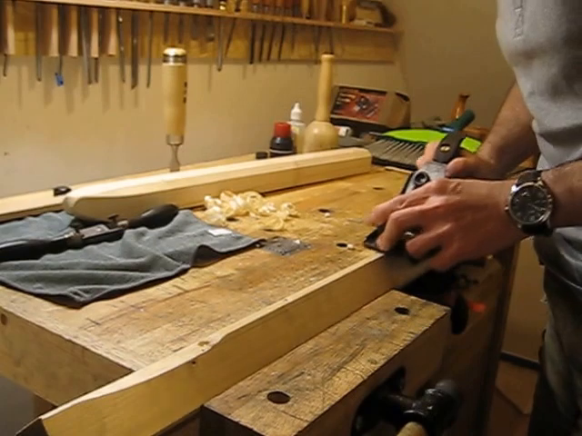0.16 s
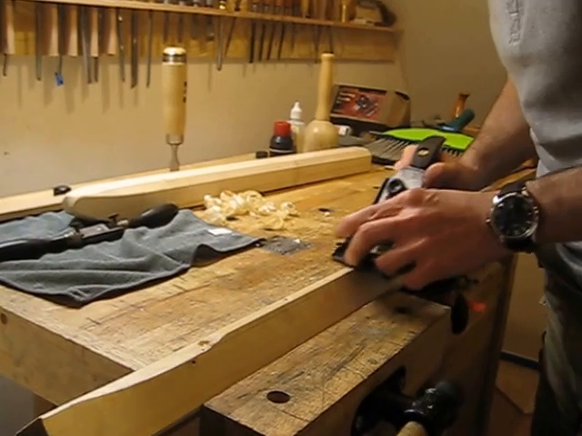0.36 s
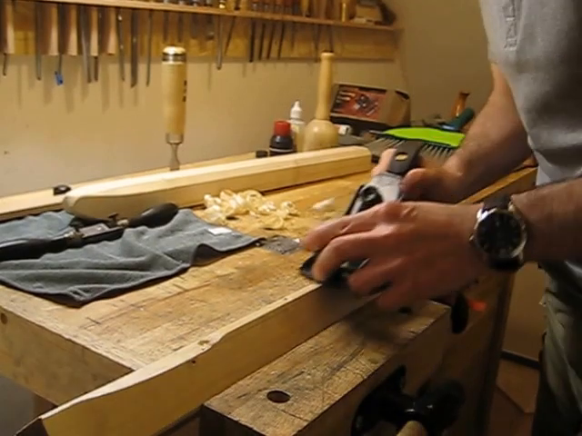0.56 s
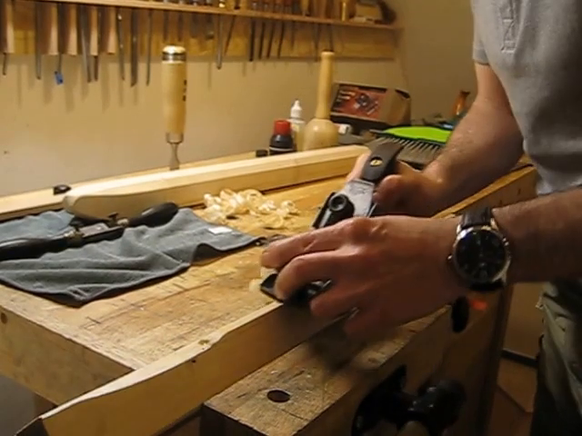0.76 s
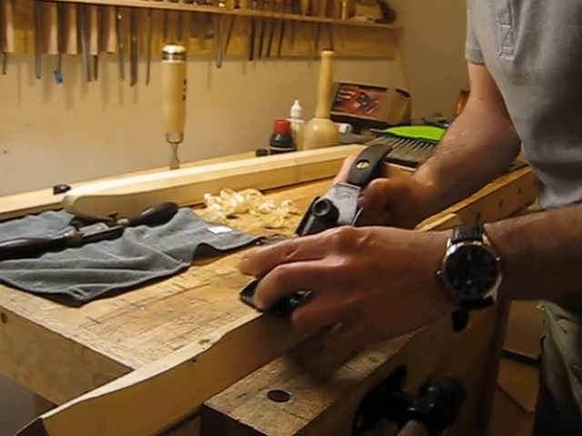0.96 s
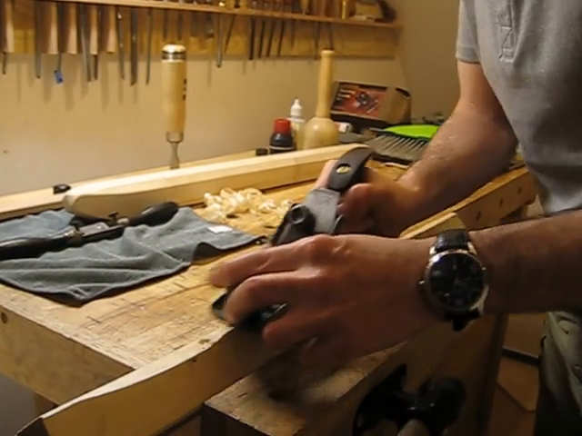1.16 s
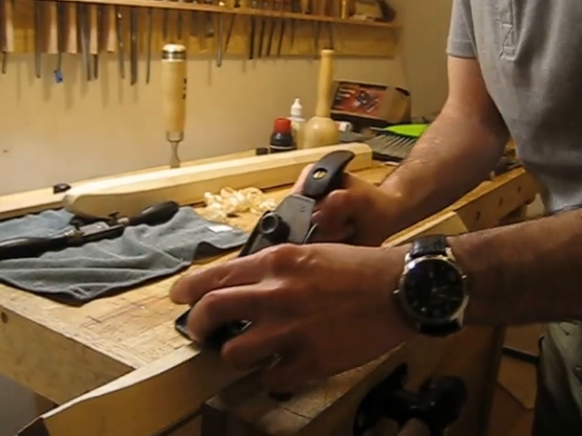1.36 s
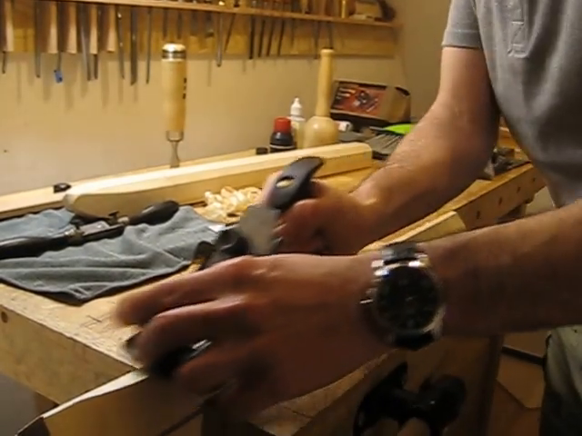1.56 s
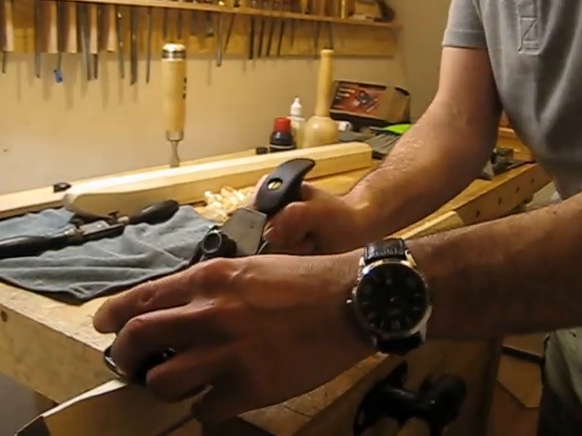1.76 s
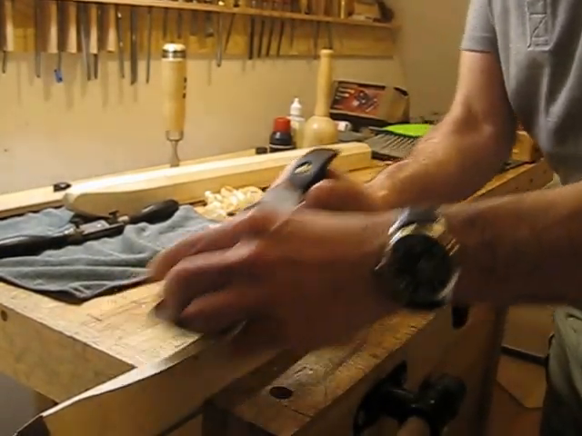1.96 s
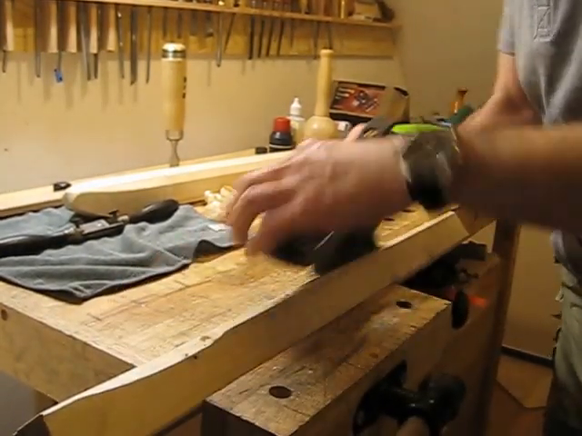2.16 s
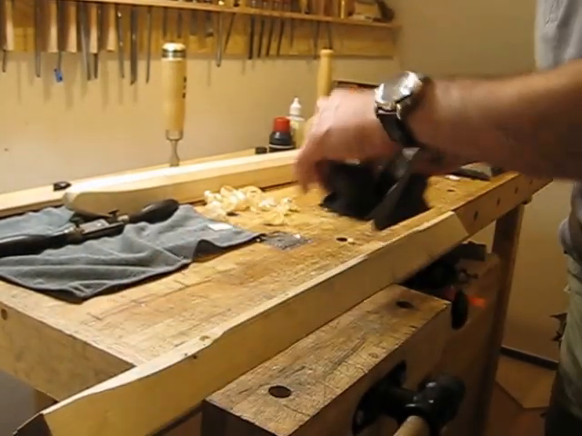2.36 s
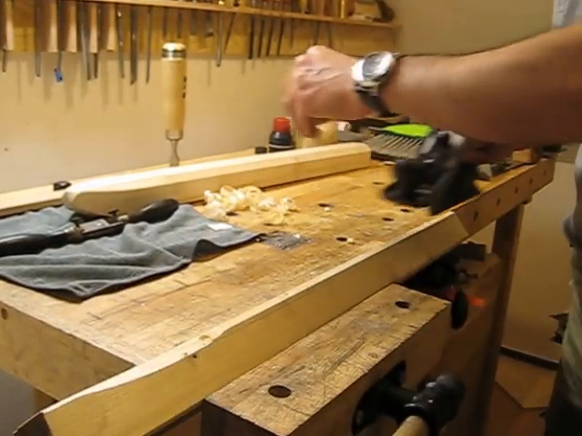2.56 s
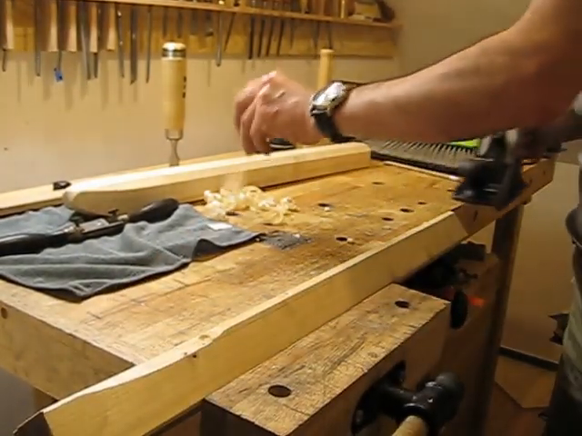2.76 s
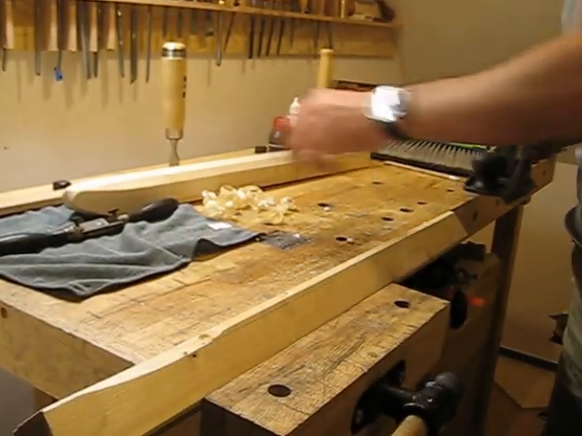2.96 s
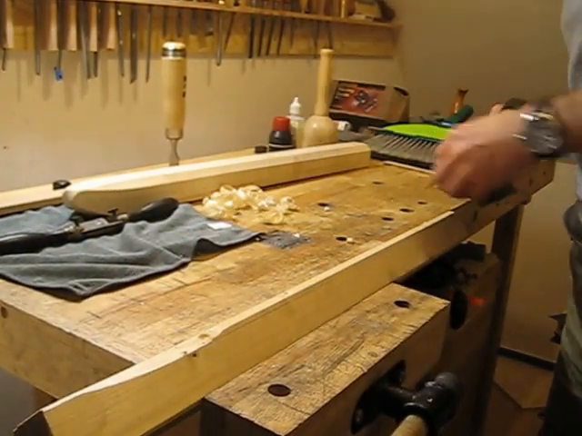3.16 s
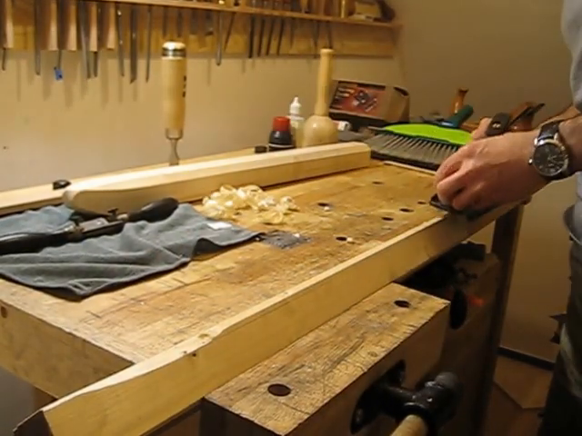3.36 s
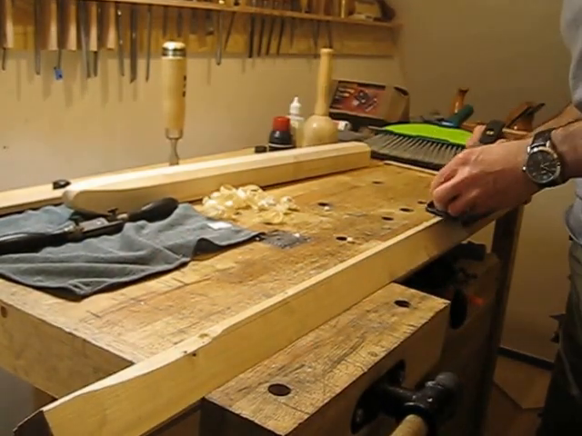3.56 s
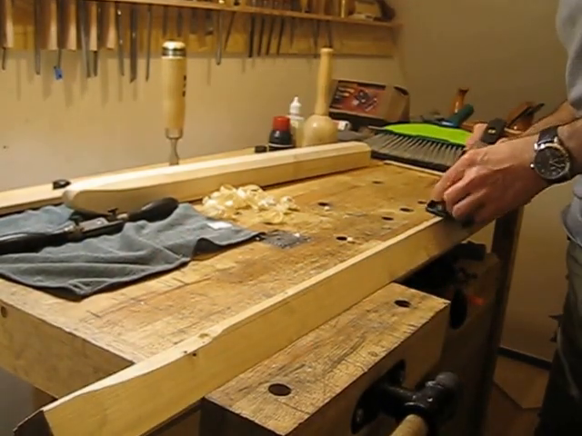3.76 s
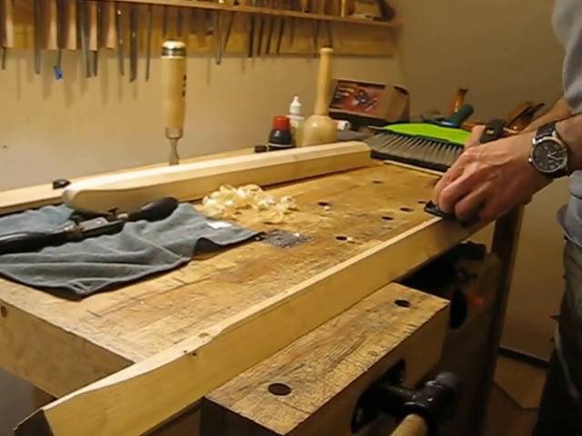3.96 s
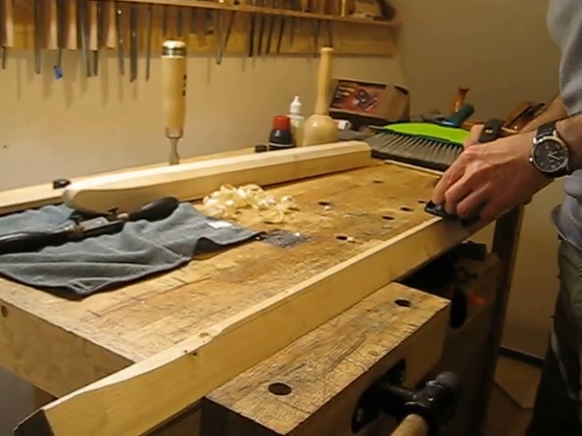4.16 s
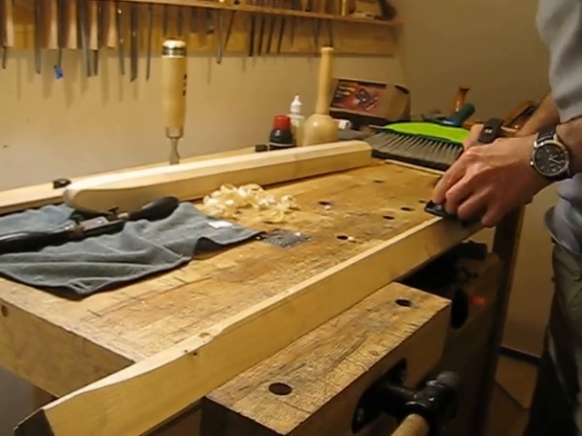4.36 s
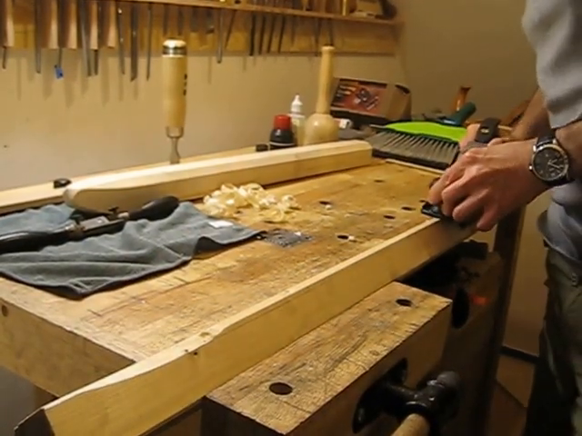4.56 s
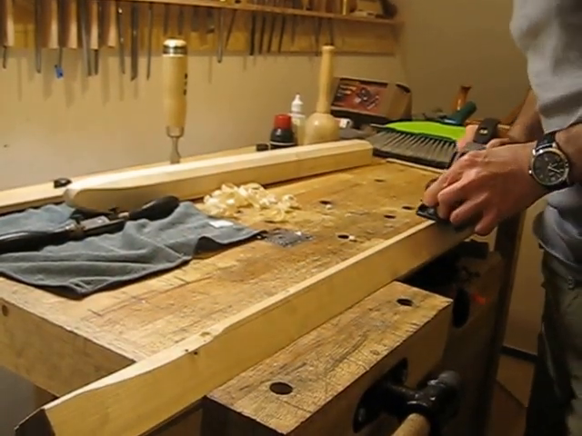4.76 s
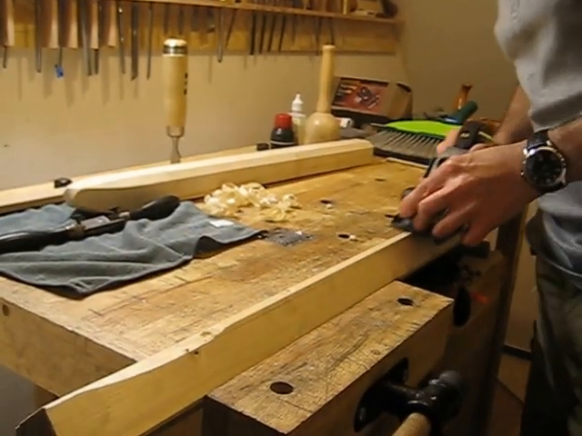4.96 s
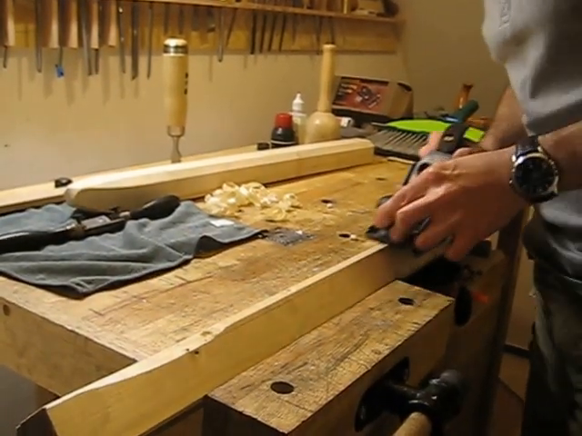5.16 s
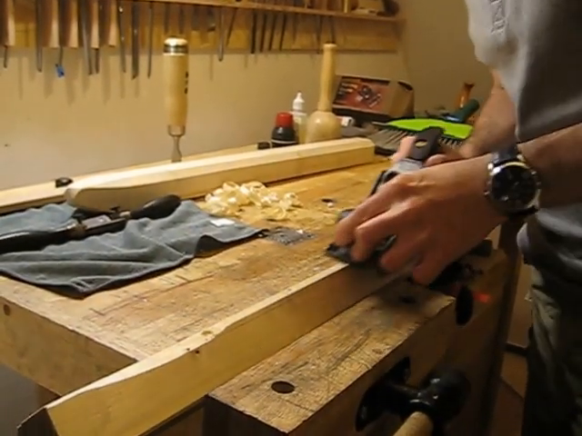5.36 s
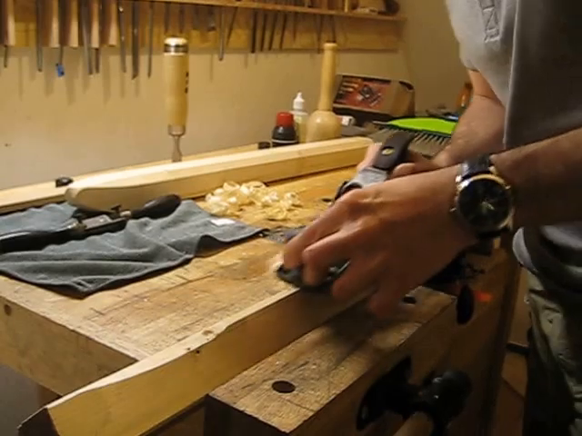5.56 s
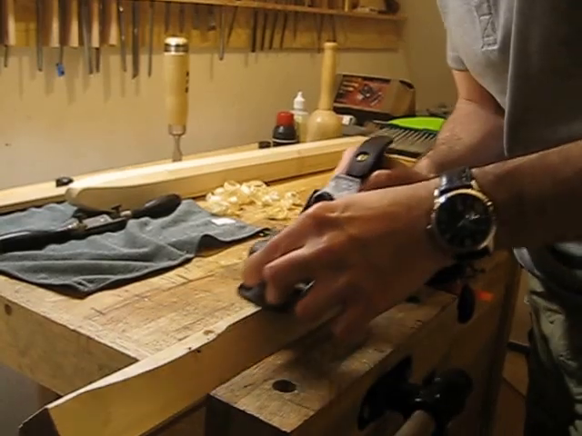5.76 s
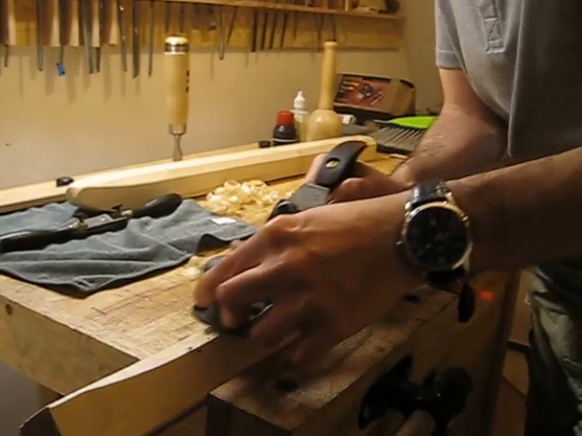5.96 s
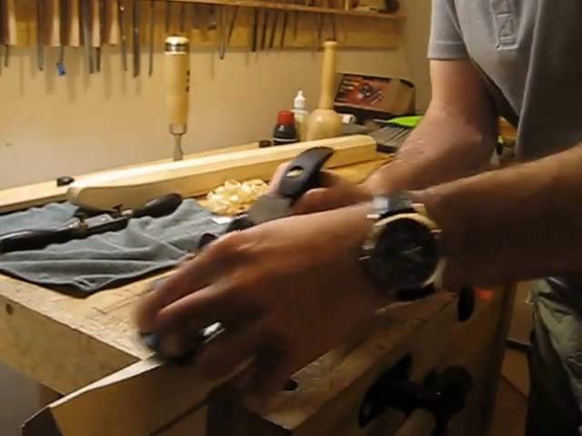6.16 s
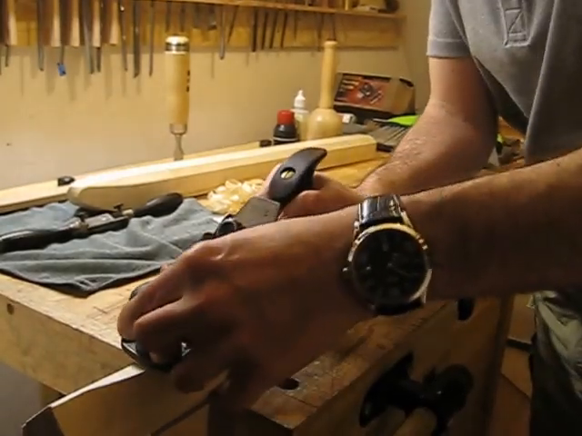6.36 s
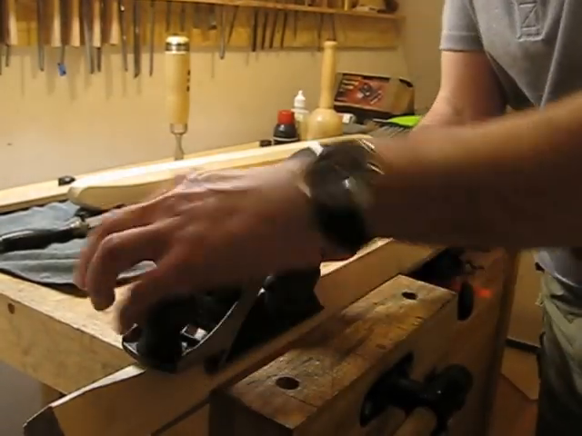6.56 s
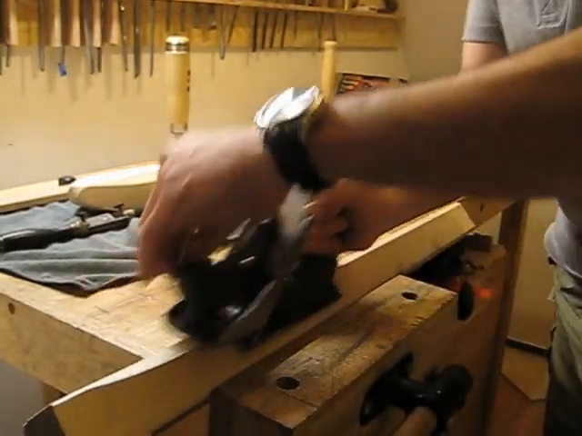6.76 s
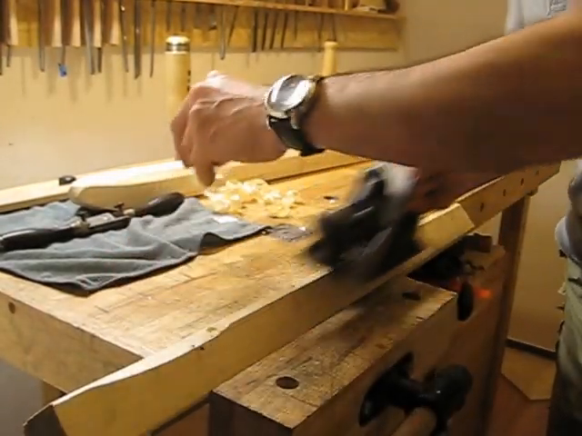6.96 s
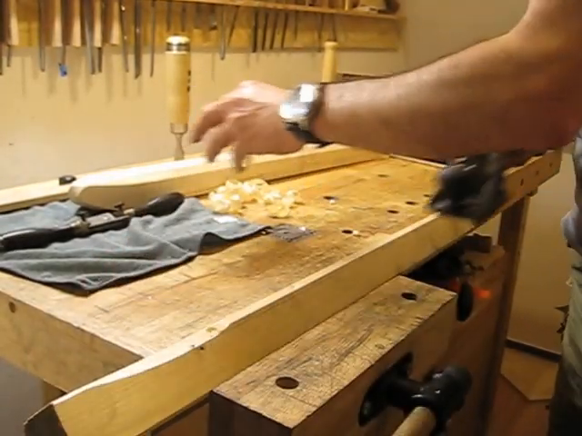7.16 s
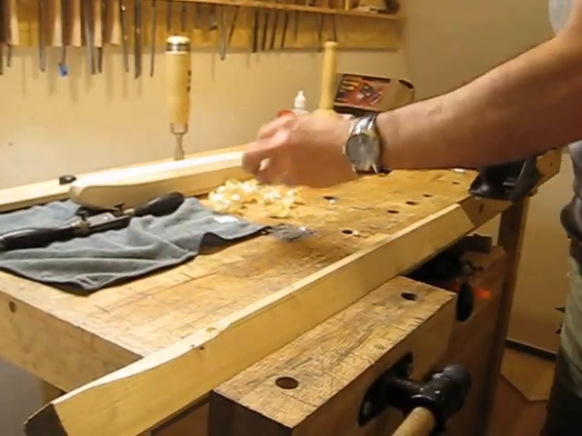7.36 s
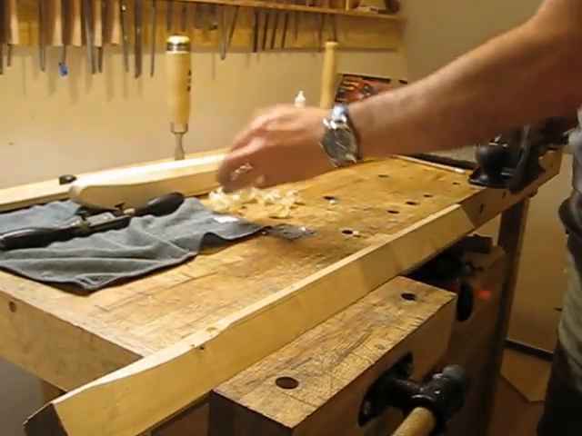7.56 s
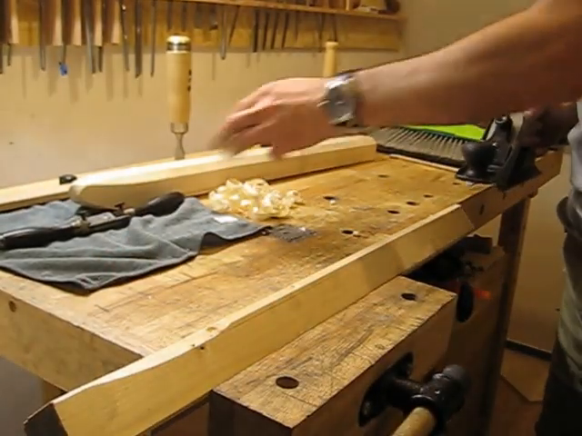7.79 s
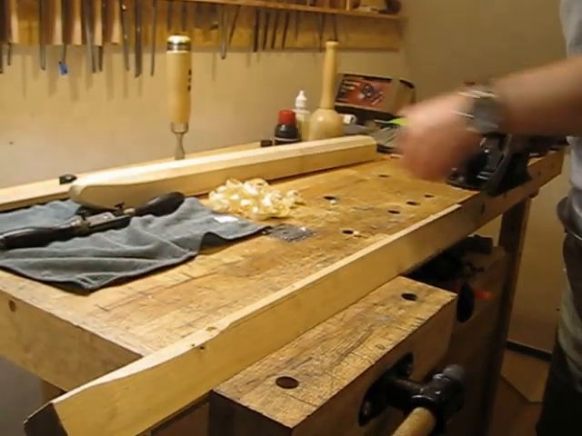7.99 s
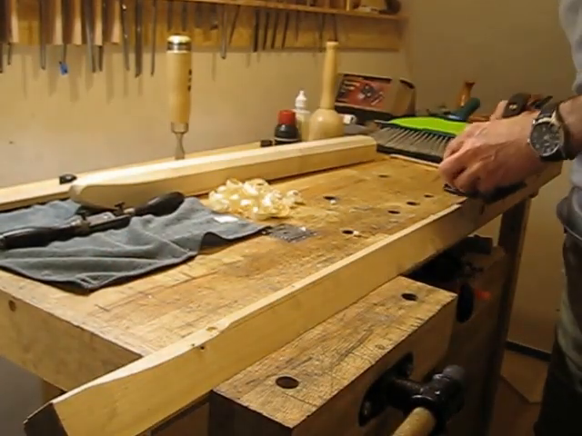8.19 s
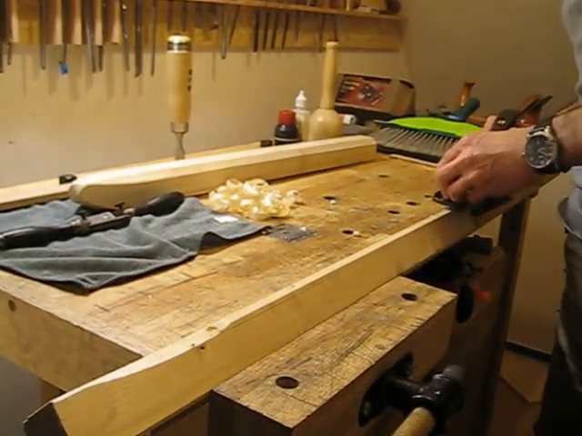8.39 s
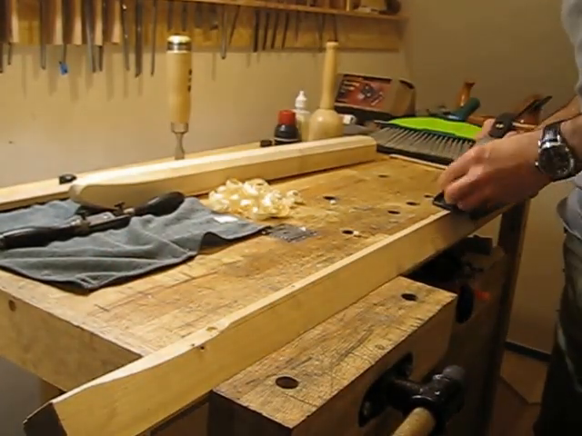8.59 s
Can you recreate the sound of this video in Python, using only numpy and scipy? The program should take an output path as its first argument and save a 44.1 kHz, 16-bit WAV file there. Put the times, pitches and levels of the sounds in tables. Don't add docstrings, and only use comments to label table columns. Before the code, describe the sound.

Close at a bench in a small workshop with a short room answer, a hand plane is already tearing along a clamped wooden leg. The coarse, hollow rasp runs from 0 to about 1.75 s, weakening near 1 s and pushed again, with chattering wooden groans, metallic buzz, hiss and sharp fibre snaps; its woody pitch sinks along the stroke. From 1.75 to 3.2 s papery shavings rustle and crackle, with a soft lift-off bump near 2.04. A hard clack at 3.57 sets the plane down; taps and short scrapes nudge it from 3.9 to 4.55. The second rasping stroke starts about 4.75, strongest from 5 to 6.1, a loud snap at 6.07, fading by 6.4. Light rustling and a soft bump at 6.7-7.0, small crackles to 7.8, near quiet, then a hard clack at 8.51. Faint hiss, hum, distant machine drone and a thin high whine persist underneath.

```python
import sys
import numpy as np
from scipy import signal
from scipy.fft import rfft, irfft, next_fast_len
from scipy.io import wavfile
from scipy.ndimage import uniform_filter1d, map_coordinates

SR = 44100
rng = np.random.default_rng(int(sys.argv[2]) if len(sys.argv) > 2 else 0)


def to_linear_factor(level_db):
    exponent = np.asarray(level_db, float) / 20
    return 10 ** exponent


def to_wav(sig):
    pcm = np.clip(np.atleast_2d(sig), -1, 1) * 32767
    pcm = np.round(pcm).astype(np.int16)
    wavfile.write(sys.argv[1], SR, pcm.T)


N = 380583


def unit(x):
    return x / np.sqrt(np.mean(np.abs(x) ** 2) + 1e-20)


def along(points, hz):
    f, v = np.transpose(points)
    return np.interp(np.log(hz + 1), np.log(f + 1), v)


def filtered(x, response):
    m = next_fast_len(N + SR // 2)
    gain = unit(response(np.fft.rfftfreq(m, 1 / SR)))
    return irfft(rfft(x, m) * gain, m)[:N]


def modes(table):
    def response(f):
        total = 0
        for k, (hz, width_hz, db) in enumerate(table):
            damping = 1j * f * width_hz
            total = total + (-1) ** k * to_linear_factor(db) * damping / (hz * hz - f * f + damping)
        return total
    return response


def colour(points):
    return lambda f: to_linear_factor(along(points, f)) * (f > points[0][0]) * (f < points[-1][0])


def curves(tables):
    rows = np.vstack(tables)
    t = np.arange(N) / SR
    return [np.interp(t, np.sort(rows[:, 0]), column) for column in rows.T[1:]]


def swells(rows):
    t = np.arange(0, N + 64, 64) / SR
    power = 0
    for s, db, rise_s, fall_s, *_ in rows:
        drop_db = 10 * np.maximum((s - t) / abs(rise_s), (t - s) / abs(fall_s))
        power = power + to_linear_factor(db - drop_db) ** 2
    return np.interp(np.arange(N) / SR, t, np.sqrt(power))


def fibres(rate, spread_db, smooth):
    force = to_linear_factor(spread_db * np.minimum(rng.exponential(size=N), 4))
    breaks = (rng.random(N) < rate / SR) * force * rng.standard_normal(N)
    return unit(unit(breaks) + smooth * rng.standard_normal(N))


def patchy(x, patchy_db, bins, frames, centre_hz=None, lift_db=0, octaves=.3, size=512):
    hz, t, z = signal.stft(x, SR, nperseg=size)
    field = uniform_filter1d(rng.standard_normal(z.shape), bins, 0)
    db = patchy_db * unit(uniform_filter1d(field, frames, 1))
    if centre_hz is not None:
        at = np.minimum((t * SR).astype(int), N - 1)
        centre = centre_hz[at]
        lift = (lift_db + 0 * centre_hz)[at]
        db = db + lift * np.exp(-(np.log2((hz[:, None] + 1) / centre) / octaves) ** 2)
    out = signal.istft(z * to_linear_factor(db), nperseg=size)[1][:N]
    level = np.sqrt(np.abs(uniform_filter1d(out ** 2, SR // 10)) + 1e-12)
    return out / level


# (start [s], end [s])
STROKES = [
    (-.05, 1.76),
    (4.715, 6.42),
]
# (time [s], force [dB], keenness [dB])
PUSHES = [
    [(0, -17.5, 3.5), (.19, -21, 1), (.33, -17, -1), (.5, -18.5, -4.5), (.62, -18.5, 0.5), (.67, -18, -4.5),
     (.78, -17.5, -12), (.86, -29, -1), (1.06, -25, -13)],
    [(1.08, -29, 1), (1.1, -19.5, 1.5), (1.17, -20, -3), (1.31, -18, -6.5), (1.46, -43, 4),
     (1.55, -25, -0.5), (1.73, -56, 3)],
    [(4.72, -48, -10), (4.79, -22.5, 4), (4.97, -20.5, 4.5), (5.33, -17.5, -3.5), (5.53, -18.5, 3),
     (5.62, -17.5, -5.5), (5.97, -17.5, -4.5), (6.17, -25.5, -6), (6.36, -60, 9)],
]
# (time [s], level [dB], rise [s], fall [s], note [Hz])
LEANS = [(.14, -27, 0.18, 0.15, 220), (.3, -21.5, 0.28, 0.068, 306), (.5, -22.5, 0.16, 0.25, 210),
         (.77, -22, 0.033, 0.12, 220), (1.0, -23, 0.086, 0.12, 182), (1.2, -18.5, 0.14, 0.11, 174),
         (1.32, -21, 0.069, 0.11, 200), (1.55, -23, 0.088, 0.038, 188), (4.77, -33.5, 0.021, 0.13, 180),
         (4.87, -29.5, 0.051, 0.051, 326), (5.12, -31, 0.042, 0.13, 325), (5.2, -21, 0.069, 0.048, 184),
         (5.46, -23.5, 0.064, 0.047, 290), (5.65, -25, 0.025, 0.21, 236), (5.92, -21.5, 0.17, 0.022, 168),
         (6.04, -21.5, .035, 0.081, 220), (6.16, -22.5, 0.1, 0.045, 227)]
# (time [s], level [dB], rise [s], fall [s])
BITES = [(.052, -38.5, 0.048, 0.023), (.2, -41, 0.02, 0.11), (.55, -37, 0.017, 0.027),
         (1.25, -42, 0.092, 0.037), (5.21, -41, .02, 0.09), (.744, -37.5, 0.014, 0.034),
         (1.097, -35.5, 0.096, 0.012), (1.568, -43.5, 0.066, 0.065), (4.93, -38.5, 0.26, 0.084),
         (5.824, -33, 0.045, 0.013), (6.07, -36, 0.0045, 0.035), (6.172, -38.5, 0.037, 0.042),
         (6.27, -40.5, 0.005, 0.0076)]
# (time [s], level [dB], rise [s], fall [s])
CURLS = [(.63, -37, 0.4, 0.08), (1.048, -41, 0.03, .04), (1.25, -46, 0.45, 0.17), (4.8, -49, .025, .15),
         (5.19, -44, 0.027, 0.67), (6.05, -41, 0.53, 0.017)]
# (centre [Hz], width [Hz], level [dB])
FRAME_MODES = [(72.5, 27, 1), (104, 43, -4)]
BENCH_MODES = [(167.7, 5.3, 5), (198.4, 12, -6), (219.4, 19, -3), (283, 32, -3), (313, 36, -1.5),
               (359, 53, -1), (470, 41, -2)]
LEG_MODES = [(494.5, 22.7, -7.5), (575.6, 46, -3.5), (642, 22.6, 0), (693.7, 10, 2), (770, 37.4, -1.5),
             (841.6, 14, -3), (877, 19, -2), (977, 37, -3), (1069, 55, -6.5), (1164, 70, -10),
             (1232, 14, -6.5), (1303, 105, -8)]
IRON_MODES = [(1690, 244, -0.5), (1852, 42, 6), (1914, 40, 5), (2057, 75, 5), (2312, 30, 5.5),
              (2440, 22, 6), (2496, 44, 4), (2760, 65, 5.5), (3010, 40, -0.5), (3316, 65, 4.5),
              (3360, 176, -5.5), (4440, 87, -0.5), (4850, 430, -9), (5700, 1700, -33)]
# (frequency [Hz], density [dB per Hz])
HISS = [(2650, 1), (4500, -2.5), (5250, -6.5), (7290, -4), (7910, -7), (8580, -6), (11500, -16),
        (12500, -18), (16200, -47), (22000, -120)]
SIZZLE = [(10500, -37), (12000, -7), (12900, -1), (14200, 0), (15800, -6)]


def cutting():
    t = np.arange(N) / SR
    ease_s = .05
    travel = sum((t >= a) * (t < b) * (t - a) / (b - a) for a, b in STROKES)
    on = sum(np.clip(np.minimum(t - a, b - t) / ease_s, 0, 1) for a, b in STROKES)
    first = t < STROKES[1][0]
    force_db, keen_db = curves(PUSHES)
    force = fibres(rate=1500, spread_db=3.5, smooth=0.84)
    tear = unit(fibres(rate=6400, spread_db=7.5, smooth=3.8) + 0.6 * force)

    bench = on * swells(LEANS)
    excess_db = np.clip(force_db - 20 * np.log10(bench + 1e-6) - 3.0, 0, 40)
    bench_hz = curves([LEANS])[-1] + 1.5 * excess_db
    frame = bench * to_linear_factor(-33.5 + np.where(first, 20, 12) * travel)
    leg = on * to_linear_factor(force_db - 1.5)
    leg_hz = 786 - np.where(first, 307, 180) * travel
    focus_db = -2 + 0.5 * travel - keen_db

    wood = frame * unit(filtered(force, lambda f: modes(FRAME_MODES)(f) ** 2))
    wood += bench * patchy(filtered(force, modes(BENCH_MODES)), 2.2, 2, 6, bench_hz,
                           lift_db=13.5, octaves=0.35, size=2048)
    wood += leg * patchy(filtered(force, modes(LEG_MODES)), 1.9, 2, 8, leg_hz,
                         focus_db, octaves=.33, size=1024)

    bites = on * swells(BITES)
    iron = np.hypot(on * to_linear_factor(force_db + keen_db - 4.0), to_linear_factor(10) * bites)
    iron_hz = 1900 + 513 * travel
    steel = iron * patchy(filtered(force, modes(IRON_MODES)), 1.5, 24, 2, iron_hz, lift_db=3.0, octaves=0.46)
    steel += to_linear_factor(-7.5) * iron * filtered(force, lambda f: modes([(2500, 2800, 0)])(f) ** 2)

    hiss = np.hypot(on * to_linear_factor(-44.5 + 0.38 * (force_db + keen_db + 22.5)), bites)
    sizzle = np.hypot(on * swells(CURLS), to_linear_factor(-23) * hiss)
    curl = to_linear_factor(11) * hiss * patchy(filtered(tear, colour(HISS)), 2.5, bins=40, frames=3)
    curl += to_linear_factor(-2.0) * sizzle * patchy(filtered(tear, colour(SIZZLE)), 1.7, bins=10, frames=6)
    return wood + steel + curl


def chatter(rows, waver, flutter_db, quicker, rate=120):
    out = np.zeros(N + 2 * SR)
    t = np.arange(-SR // 4, SR // 4) / SR
    for s, db, rise_s, fall_s, hz in rows:
        drift = map_coordinates(rng.standard_normal(140), [(t - t[0]) * rate])
        flutter = map_coordinates(rng.standard_normal(140), [(t - t[0]) * rate])
        width_s = quicker * np.where(t < 0, abs(rise_s), abs(fall_s))
        swell_db = db + flutter_db * flutter - 10 * (t / width_s) ** 2
        tone = np.sin(2 * np.pi * hz * np.cumsum(1 + waver * drift) / SR)
        out[round(s * SR) + SR:][:len(t)] += to_linear_factor(swell_db) * tone
    return out[SR + SR // 4:][:N]


# (time [s], peak [dB], rise [s], fall [s], frequency [Hz])
BENCH_SINGS = [(.255, -22, 0.034, 0.03, 312), (.36, -21.5, 0.039, 0.064, 312),
               (.488, -20.5, 0.11, 0.063, 204), (.563, -22.5, .05, 0.053, 427),
               (.894, -21, 0.054, 0.045, 161.3), (1.312, -20.5, .041, 0.035, 226),
               (4.86, -28, 0.045, .03, 162), (5.132, -19.5, 0.052, 0.032, 226),
               (5.631, -26, .03, 0.11, 439), (6.031, -28, 0.04, 0.082, 226),
               (6.13, -21.5, 0.037, 0.05, 161), (7.04, -35, .06, 0.055, 168)]
LEG_SINGS = [(0.11, -20, 0.042, 0.028, 700), (0.29, -19, 0.05, 0.068, 681), (0.313, -22, 0.1, 0.053, 964),
             (0.337, -19.5, 0.035, 0.02, 1410), (0.348, -19, 0.045, 0.031, 565),
             (0.354, -24, 0.048, 0.041, 1148), (0.389, -26, 0.13, 0.095, 678),
             (0.586, -25, 0.04, 0.034, 742), (0.65, -22, 0.031, 0.12, 830), (0.685, -13, 0.053, 0.033, 684),
             (0.772, -17.5, 0.028, 0.038, 639), (1.016, -25.5, 0.031, 0.03, 631),
             (1.115, -22.5, 0.03, 0.023, 553), (1.242, -24, 0.073, 0.091, 639),
             (1.312, -20.5, 0.12, 0.085, 472.5), (4.876, -22, 0.063, 0.049, 1134),
             (4.923, -20, 0.086, 0.032, 771), (4.998, -25, 0.032, 0.14, 732),
             (5.224, -26, 0.027, 0.041, 1315), (5.23, -29, 0.035, 0.12, 1450),
             (5.259, -21, 0.078, 0.12, 647), (5.3, -20, 0.025, 0.04, 748), (5.317, -18, 0.026, 0.02, 1306),
             (5.323, -21, 0.076, 0.065, 679), (5.515, -21, 0.1, 0.026, 687),
             (5.544, -19.5, 0.073, 0.033, 792), (5.666, -21, 0.072, 0.093, 633),
             (5.712, -16.5, 0.032, 0.041, 838), (5.724, -19.5, 0.19, 0.067, 625),
             (5.788, -20.5, 0.1, 0.15, 614), (5.834, -21, 0.078, 0.041, 843),
             (5.892, -21.5, 0.07, 0.25, 559), (5.944, -19, 0.056, 0.077, 626),
             (6.162, -20.5, 0.015, 0.027, 690), (6.177, -29, 0.027, 0.021, 1400)]
IRON_SINGS = [(0.015, -17, 0.064, 0.01, 1894), (0.026, -26.5, 0.032, 0.061, 3316),
              (0.078, -22.5, 0.017, 0.019, 2045), (0.212, -23, 0.027, 0.04, 2226),
              (0.342, -21, 0.029, 0.014, 2200), (0.476, -25.5, 0.015, 0.022, 3080),
              (0.485, -19, 0.023, 0.013, 2260), (0.641, -26, 0.091, 0.034, 2256),
              (1.097, -22, 0.027, 0.019, 2620), (1.248, -27, 0.023, 0.027, 2900),
              (1.251, -28, 0.02, 0.014, 2670), (1.251, -27, 0.032, 0.025, 2490),
              (2.1, -49, .025, .025, 5100), (2.11, -40, .02, 0.023, 1100), (2.112, -39, 0.026, 0.02, 4400),
              (4.285, -35, 0.014, 0.022, 4850), (4.465, -37, .025, .03, 4950),
              (4.51, -38, .03, 0.023, 5200), (4.798, -26, 0.016, 0.019, 1684),
              (4.923, -31, 0.038, 0.051, 4640), (4.923, -20, 0.026, 0.018, 2799),
              (4.943, -21, 0.032, 0.1, 1800), (4.957, -31, 0.07, 0.018, 2045),
              (4.998, -27, 0.05, 0.02, 4420), (5.01, -29.5, 0.044, 0.07, 4860),
              (5.016, -22, 0.02, 0.02, 3359), (5.132, -27, 0.019, 0.012, 3122),
              (5.204, -26, 0.016, 0.079, 2250), (5.21, -26.5, 0.02, 0.073, 2540),
              (5.23, -25, 0.021, 0.02, 3036), (5.312, -20.5, 0.022, 0.015, 2304),
              (5.558, -22, 0.016, 0.015, 3143), (5.558, -17, 0.024, 0.018, 2368),
              (5.834, -26, 0.02, 0.018, 2993), (5.912, -22.5, 0.018, 0.028, 2267),
              (6.156, -28, 0.015, 0.017, 3220)]


def singing():
    bench = chatter(BENCH_SINGS, .03, 2.1, .9)
    leg = chatter(LEG_SINGS, .02, 2.6, .9)
    return bench + leg + chatter(IRON_SINGS, .034, 4.1, 1.1, rate=260)


# (time [s], peak [dB], brightness [dB])
SNAPS = [(0.366, -14, -2), (0.398, -14, -24), (0.528, -16, -16), (0.6394, -12, -7), (0.7425, -18, 3),
         (0.797, -13, -26), (1.075, -8, -25), (1.558, -9.5, -7), (1.5958, -19, 1), (1.0475, -28, -6),
         (5.0477, -22, -19), (5.125, -9, -25), (5.4123, -26, -8), (5.6054, -28, 7), (5.762, -9.5, -20),
         (5.9571, -20, -3), (5.3274, -11.5, -4), (5.8, -24, -30), (6.0715, -3.5, -7), (6.155, -15, -4),
         (6.259, -16, -4), (6.2684, -12, -22)]
# (time [s], peak [dB], brightness [dB])
CRACKLES = [(1.7563, -19, -25), (2.276, -25, -11), (2.338, -25, -2), (2.437, -13, 0.5), (2.464, -18, -5),
            (2.496, -22, -8), (2.841, -12.5, -9), (2.859, -16, -18), (2.9766, -30, -16), (3.0629, -30, -15),
            (3.189, -31, -7), (6.693, -27, -15), (6.76, -17, -10), (6.79, -30, 15.5), (7.4474, -23, -10),
            (7.671, -24.5, -17), (7.787, -20, -24)]


def snaps():
    out = np.zeros(N + 4096)
    t = np.arange(4096) / SR
    f = np.fft.rfftfreq(len(t), 1 / SR)
    dull = unit(modes([(4300, 3500, 0)])(f) ** 2)
    bright = unit(modes([(10500, 5000, 0)])(f) ** 2)
    decay = to_linear_factor(-60 * t / .012) + to_linear_factor(-11 - 60 * t / .06)
    for s, db, bright_db in SNAPS + CRACKLES:
        burst = decay * rng.standard_normal(len(t))
        tone = dull + to_linear_factor(bright_db) * bright
        out[round(s * SR):][:len(t)] += to_linear_factor(db - 10.5) * irfft(rfft(burst) * tone)
    return out[:N]


# (time [s], level [dB], rise [s], fall [s])
RUSTLES = [(1.757, -33.5, 0.0055, 0.018), (1.93, -48.5, 0.14, 0.051), (2.04, -39, .006, 0.065),
           (2.11, -37.5, 0.032, 0.092), (2.279, -39.5, 0.0051, 0.041), (2.34, -38.5, 0.0074, 0.064),
           (2.442, -30, 0.014, 0.048), (2.55, -48, 0.017, 0.87), (2.852, -28.5, 0.0077, 0.02),
           (2.93, -51, .05, 0.24), (6.55, -54, 0.86, 0.13), (6.706, -32.5, 0.011, 0.096),
           (6.79, -35.5, 0.063, 0.021), (6.92, -42.5, 0.034, 0.18), (7.01, -33.5, 0.046, 0.013),
           (7.35, -46.5, 0.14, 0.29), (7.5, -45, 0.24, 0.085), (7.59, -44, .025, .04),
           (7.68, -42, .01, .04), (7.73, -45, .006, .02), (7.79, -43, .008, .03)]
# (time [s], level [dB], rise [s], fall [s])
RUBS = [
    (2.04, -31.5, 0.0034, 0.038),
    (6.706, -52, 0.019, 0.099),
    (6.944, -60, 0.0042, 0.043),
]
# (time [s], level [dB], rise [s], fall [s])
DRAGS = [
    (3.955, -38, 0.053, 0.053),
    (4.05, -39, 0.09, 0.011),
    (4.33, -37.5, 0.075, 0.02),
    (4.52, -23.5, 0.054, 0.049),
    (4.65, -45, .05, 0.059),
]
# (time [s], level [dB], rise [s], fall [s], hiss over it [dB])
SCRAPES = [
    (3.86, -52, 0.045, 0.22, 0),
    (3.955, -34, 0.017, 0.019, -22),
    (4.4, -46.5, 0.15, 0.3, 1),
    (4.443, -24.5, 0.0078, 0.088, -5),
    (4.545, -38, 0.035, 0.0086, -3),
]
# (frequency [Hz], density [dB per Hz])
RUSTLE = [(410, -46), (700, -22), (922, -4), (1750, -3.5), (2700, 1), (3990, -1), (7290, -4),
          (11200, -10.5), (16000, -33)]


def handling():
    iron = swells(SCRAPES)
    hiss = swells([(s, db + over_db, rise_s, fall_s) for s, db, rise_s, fall_s, over_db in SCRAPES])
    crumple = filtered(fibres(rate=2500, spread_db=1.8, smooth=1.16), colour(RUSTLE))
    rustle = to_linear_factor(1.84) * swells(RUSTLES) * patchy(crumple, 1.6, bins=24, frames=3)
    force = fibres(rate=850, spread_db=1.0, smooth=1.2)

    def ringing_hiss(f):
        return colour(HISS)(f) * (1 + 0.98 * np.abs(modes([(5050, 250, 0)])(f)))

    slide = iron * filtered(force, modes(IRON_MODES)) + hiss * filtered(force, ringing_hiss)
    slide += swells(DRAGS) * filtered(force, modes([(83.5, 27, -12.0)] + BENCH_MODES + LEG_MODES))
    rub = swells(RUBS) * filtered(force, modes(BENCH_MODES + LEG_MODES[:5]))
    return rustle + rub + slide


def blows(events, crack, rattle, crack_t60, rise, treble, dull, rebound=0):
    t = np.arange(SR // 2) / SR
    f = np.fft.rfftfreq(len(t), 1 / SR)
    ringing = dull + np.abs(modes(BENCH_MODES + LEG_MODES + IRON_MODES)(f))
    crack_env = to_linear_factor(-60 * t / crack_t60) * np.minimum(t / 0.0012, 1) ** 2
    crack_env = crack_env * (1 + rebound * (t > .0043) * to_linear_factor(-60 * (t - .0043) / 0.014))
    out = np.zeros(N + len(t))
    for s, db, t60, rattle_db, tilt_db in events:
        tilt = to_linear_factor(tilt_db * np.log2((f + 100) / 1000))
        crack_tone = unit(colour(crack)(f) * tilt * (1 + ringing))
        rattle_tone = unit(colour(rattle)(f) * tilt * ringing)
        snap, buzz = irfft(rfft(rng.standard_normal((2, len(t)))) * [crack_tone, rattle_tone])
        hz, at, z = signal.stft(buzz, SR, nperseg=256)
        decay = to_linear_factor(-60 * at / t60 * ((hz[:, None] + 150) / 1000) ** treble)
        buzz = signal.istft(z * decay, nperseg=256)[1][:len(t)]
        blow = snap * crack_env + to_linear_factor(rattle_db) * buzz * (1 - np.exp(-t / rise))
        out[round(s * SR):][:len(t)] += to_linear_factor(db - 4) * blow
    return out[:N]


# (time [s], peak [dB], rattle t60 [s], rattle [dB], brightness [dB per octave])
SET_DOWN = [
    (3.565, 0.5, 0.23, -4.5, 3),
    (8.511, 0.5, 0.26, -5, 3),
]
NUDGES = [
    (3.892, -20, 0.39, -8, -3.5),
    (3.9595, -13.5, 0.32, -10, -0.5),
    (4.1995, -16.5, 0.18, -1, -3.5),
    (4.272, -11, 0.15, -5, 2.5),
    (4.367, -27, 0.13, -10, -7.5),
    (4.4355, -10.5, 0.18, -13, 2.5),
    (4.519, -19.5, 0.2, 9.5, 5.5),
]
LIFTS = [
    (2.036, -23, 0.3, 0.5, 1.7),
    (6.931, -27.5, 0.26, 4.3, -0.85),
]
# (frequency [Hz], density [dB per Hz])
CRACK = [(180, -51), (300, -45), (801, 4), (1150, 0.5), (1490, 2.5), (2140, -6), (2360, -11.5), (3440, -3),
         (5350, -13.5), (7420, -15), (15000, -44)]
BODY = [(59, -39), (100, -5), (232, 2.5), (432, -8), (888, -0.5), (1040, -4.5), (1900, -20.5), (2280, -27),
        (4500, -21.5), (7270, -43), (12000, -52), (15600, -82), (22000, -120)]
TAP = [(240, -7), (400, -22), (1050, 2), (2030, 0.5), (3290, -6.5), (3630, -7), (4700, -13.5), (6140, -22),
       (7780, -25), (11000, -46), (14300, -74), (22000, -120)]
THUD = [(59, -50), (110, -24), (140, 0), (444, -0.5), (1000, -10), (1700, -17), (2000, -32), (2600, -47),
        (4400, -120)]


def knocks():
    hard = blows(SET_DOWN, CRACK, BODY, crack_t60=0.034, rise=0.034, treble=0.19, dull=0.67, rebound=0.85)
    light = blows(NUDGES, TAP, TAP, crack_t60=0.081, rise=0.0068, treble=0.4, dull=.35)
    lifts = blows(LIFTS, THUD, THUD, crack_t60=0.13, rise=0.017, treble=0.28, dull=0.22)
    return hard + light + lifts


# (time [s], peak [dB], frequency [Hz], t60 [s])
TICKS = [(3.575, -29.5, 73, 0.54), (3.58, -26, 226, 0.23), (3.806, -41, 910, 0.12), (3.808, -40, 1090, 0.1),
         (3.806, -38, 2000, 0.06), (3.806, -44, 2700, .08), (4.5, -38, 160, 0.27), (4.63, -43, 75, .6),
         (6.24, -45, 312, 1.1), (6.507, -43, 1070, 0.13), (6.94, -32, 190, .15), (6.968, -24, 210, .05),
         (7.0, -48, 312, .6), (8.52, -27, 73, .5), (8.53, -19.5, 239, 0.39)]


def ticks():
    out = np.zeros(N + SR)
    t = np.arange(SR) / SR
    for s, db, hz, t60 in TICKS:
        swell = 1 - np.exp(-t * hz / 0.5)
        out[round(s * SR):][:SR] += to_linear_factor(db - 60 * t / t60) * np.sin(2 * np.pi * hz * t) * swell
    return out[:N]


# (frequency [Hz], t60 [s])
WORKSHOP = [(150, 0.44), (600, 0.24), (2000, 0.24), (6000, 0.23), (12000, 0.15)]


def workshop(x):
    hop = SR // 3
    out = np.zeros(N + 2 * SR)
    padded = np.pad(x, 2 * hop)
    for start in range(-hop, N, hop):
        hz, t, z = signal.stft(rng.standard_normal(SR // 2), SR, nperseg=256)
        decay = to_linear_factor(-60 * t / along(WORKSHOP, hz)[:, None])
        tail = signal.istft(z * decay, SR, nperseg=256)[1]
        piece = padded[start + 2 * hop:][:2 * hop] * np.sqrt(np.hanning(2 * hop))
        echo = signal.fftconvolve(piece, tail / np.linalg.norm(tail))
        out[start + hop + 300:][:len(echo)] += echo
    return out[hop:][:N]


# (frequency [Hz], density [dB per Hz])
QUIET = [(30, -25), (55, -13.5), (130, -11), (367, -8), (430, -10.5), (1000, -12), (3000, -16), (6900, -20),
         (8400, -19), (10500, -15.5), (12000, -29.5), (13500, -27), (15800, -25)]
# (centre [Hz], width [Hz], level [dB rms])
DRONE = [
    (310, 9.9, -67.5),
    (356, 1.7, -67),
]


def background():
    out = to_linear_factor(-48.5) * filtered(rng.standard_normal(N), colour(QUIET))
    for hz, width_hz, db in DRONE:
        resonance = modes([(hz, width_hz, 0)])
        out += to_linear_factor(db) * filtered(rng.standard_normal(N), lambda f: resonance(f) ** 2)
    hum_hz, hum_db = 49, -61.5
    return out + to_linear_factor(hum_db) * np.sin(2 * np.pi * hum_hz * np.arange(N) / SR)


def whine():
    row_hz, frame_hz, frame_start_s = 7569.3, 30, .0117
    scan_hz, flip_hz = 7867.14, 14.97
    t = np.arange(N) / SR
    rows = 2 * np.pi * row_hz * ((t - frame_start_s) % (1 / frame_hz))
    flip = np.sign(np.sin(2 * np.pi * flip_hz * t))
    scan = flip * np.sin(2 * np.pi * scan_hz * t)
    return to_linear_factor(-41.0) * np.sin(rows) + to_linear_factor(-60.0) * np.sin(2 * rows) + to_linear_factor(-56.0) * scan


def scene():
    near = cutting() + singing() + handling() + knocks() + ticks() + snaps()
    return (near + to_linear_factor(-9.5) * workshop(near) + background())[None]


def top_cut(x):
    return signal.sosfilt(signal.butter(12, 15840, fs=SR, output="sos"), x)


def record(dry):
    low_hz, top_hz = 18, 15830
    size = next_fast_len(N)
    f = np.fft.rfftfreq(size, 1 / SR)
    band = (f < top_hz) / (1 + (low_hz / (f + 1)) ** 4)
    loudness = np.sqrt(np.abs(uniform_filter1d(dry ** 2, SR // 20)))
    mix = dry + whine() / (1 + 3.5 * loudness)
    mix = irfft(rfft(mix, size) * band, size)[:, :N]
    mix = mix / (1 + np.abs(mix / .98) ** 8) ** (1 / 8)
    return top_cut(mix)


dry = scene()
out = record(dry)
to_wav(out)
```